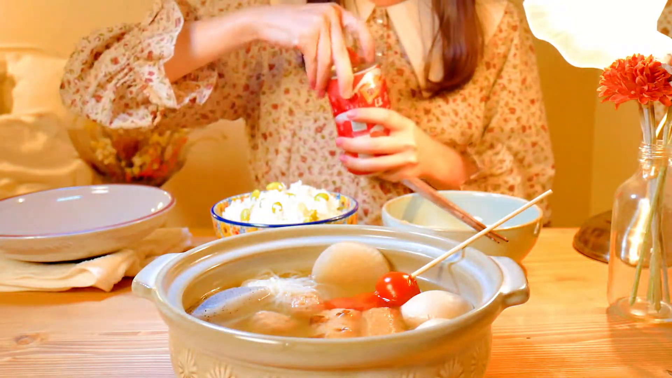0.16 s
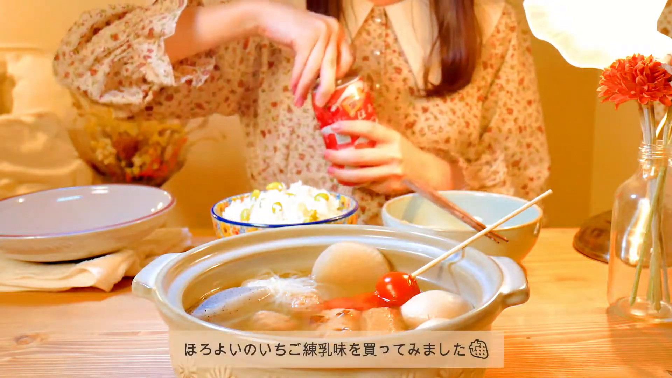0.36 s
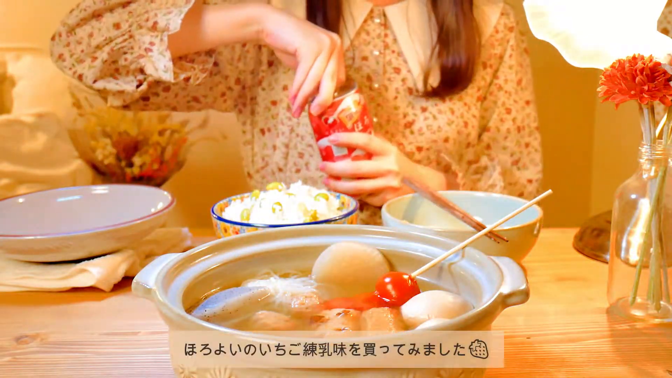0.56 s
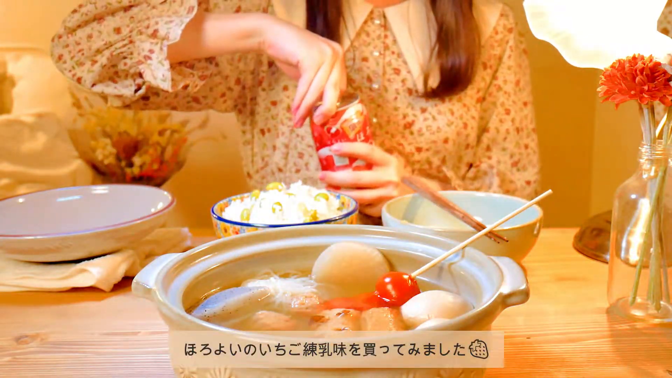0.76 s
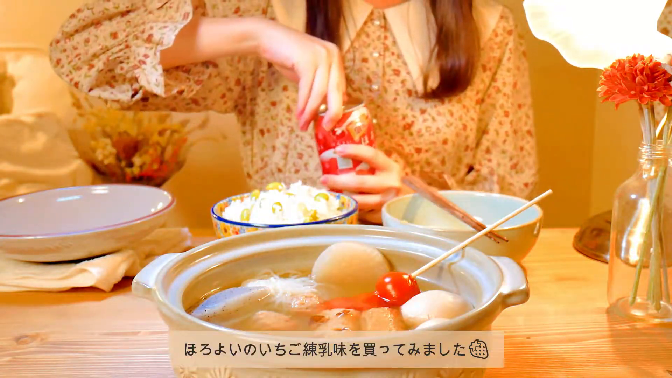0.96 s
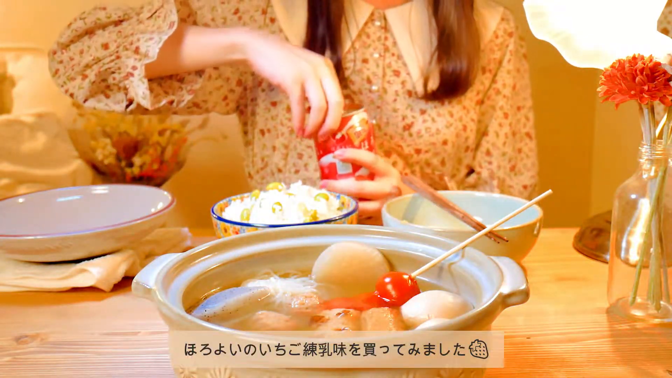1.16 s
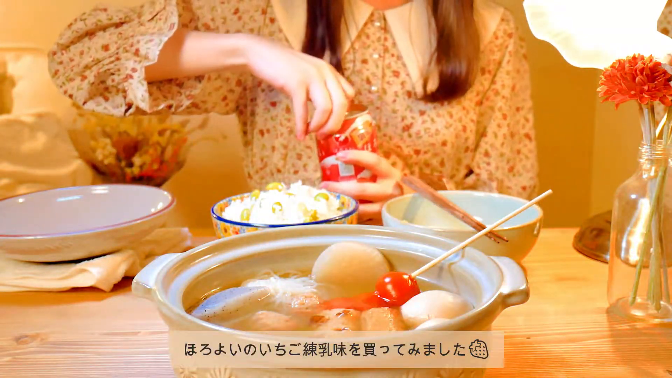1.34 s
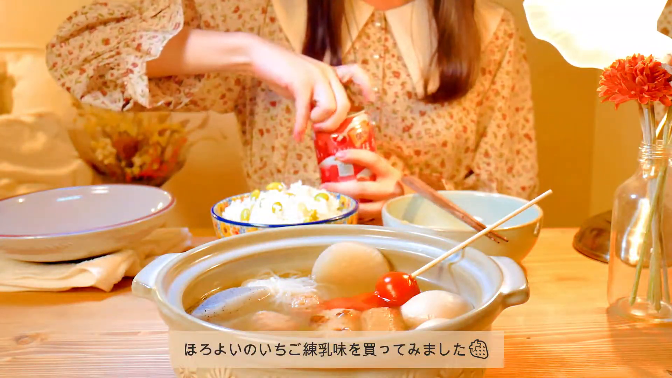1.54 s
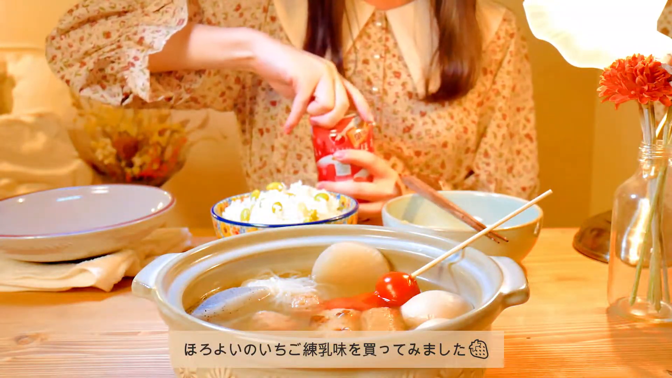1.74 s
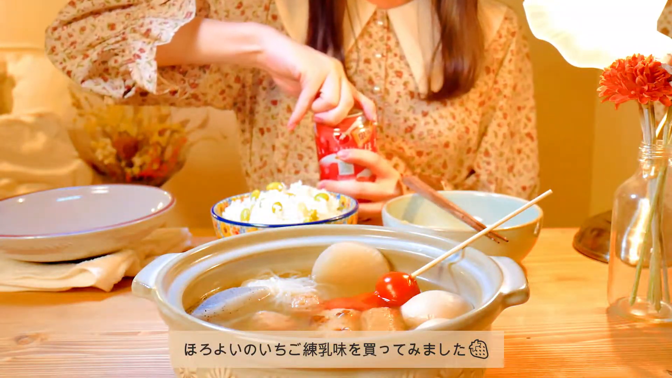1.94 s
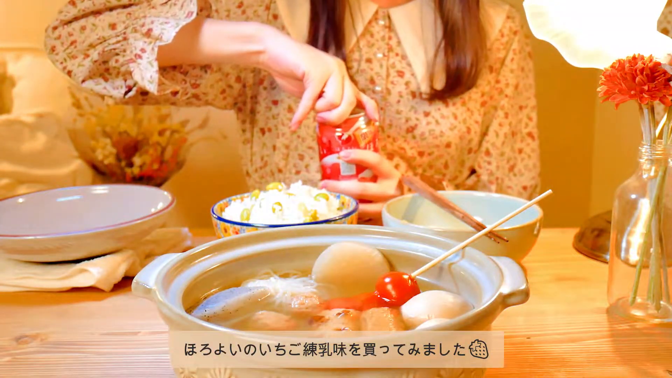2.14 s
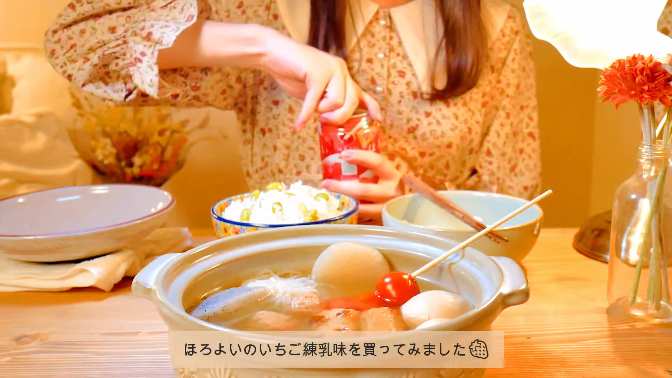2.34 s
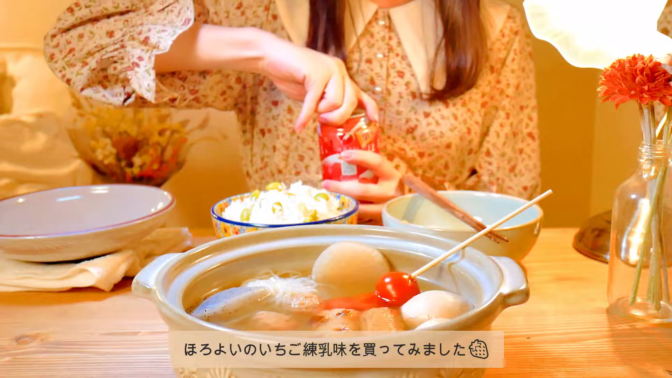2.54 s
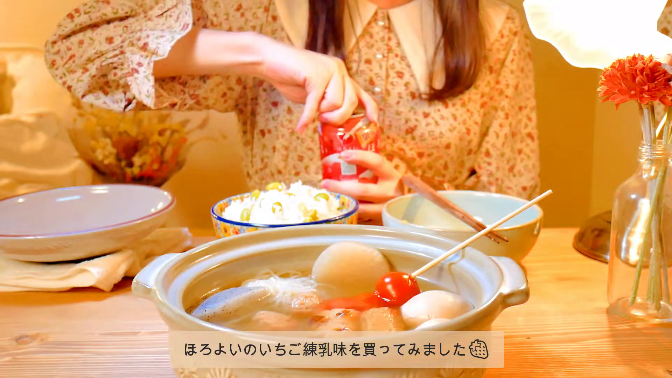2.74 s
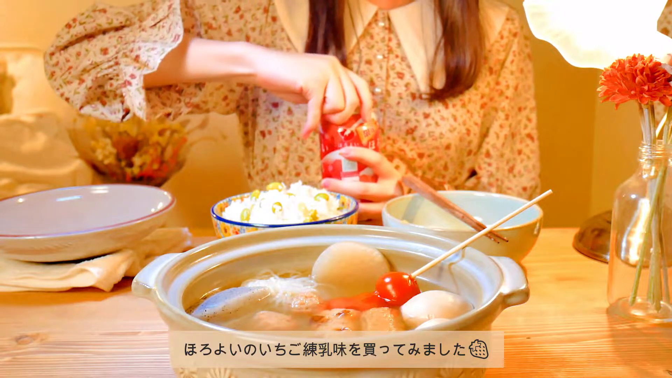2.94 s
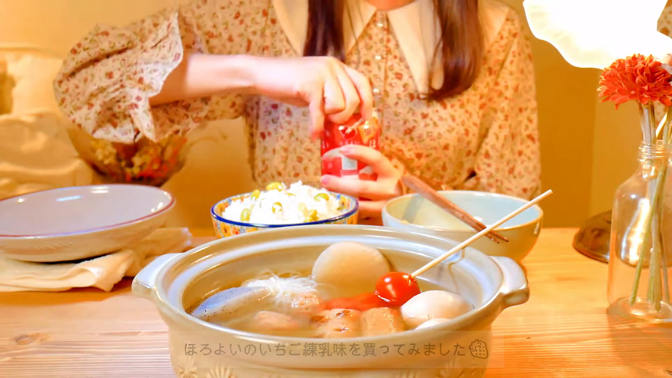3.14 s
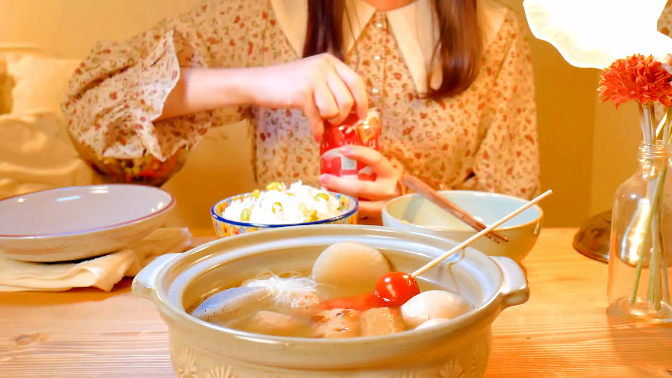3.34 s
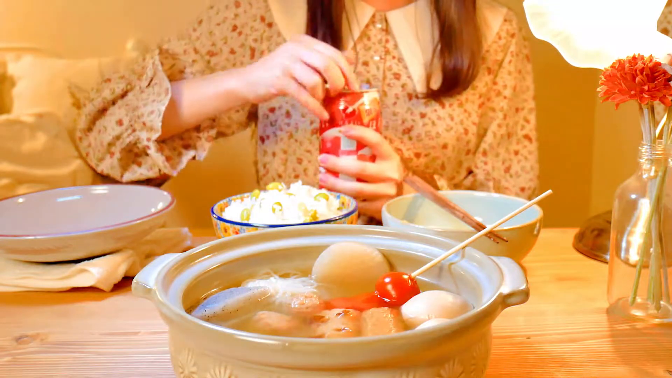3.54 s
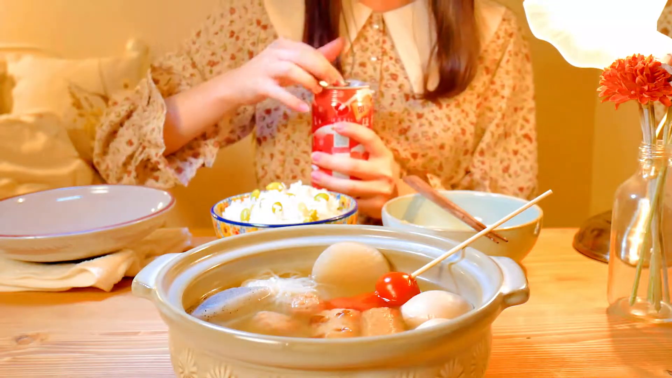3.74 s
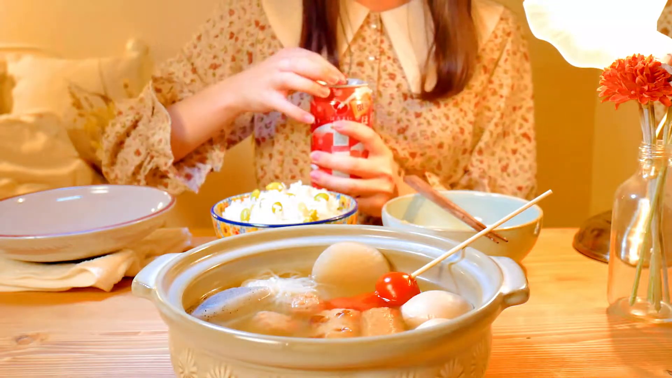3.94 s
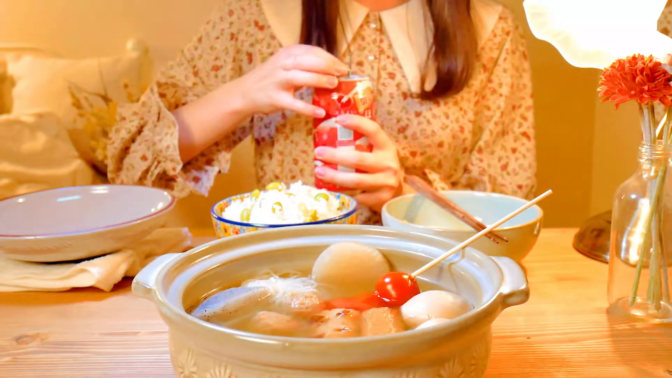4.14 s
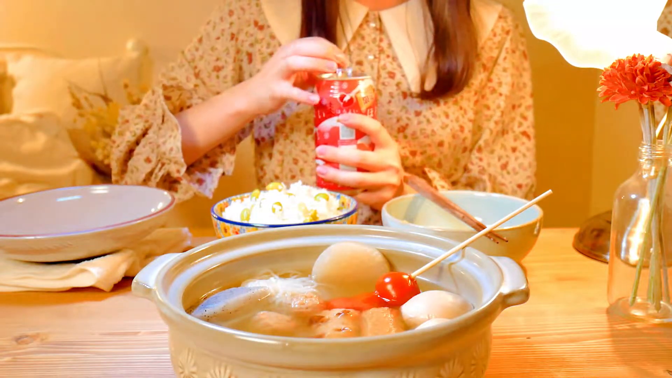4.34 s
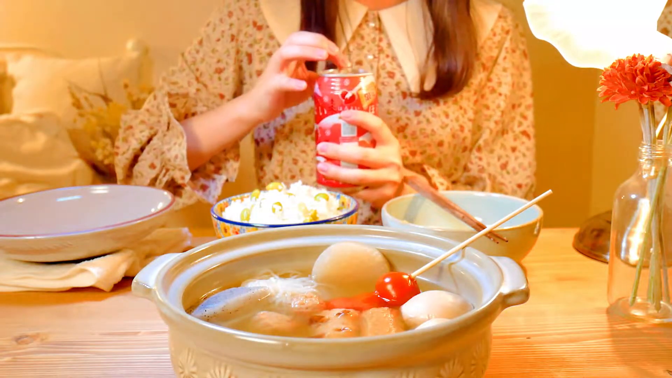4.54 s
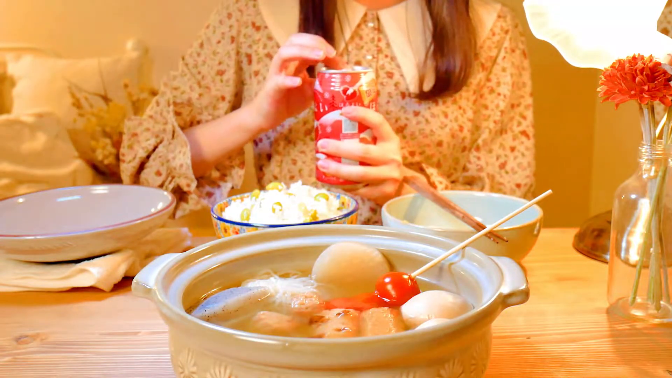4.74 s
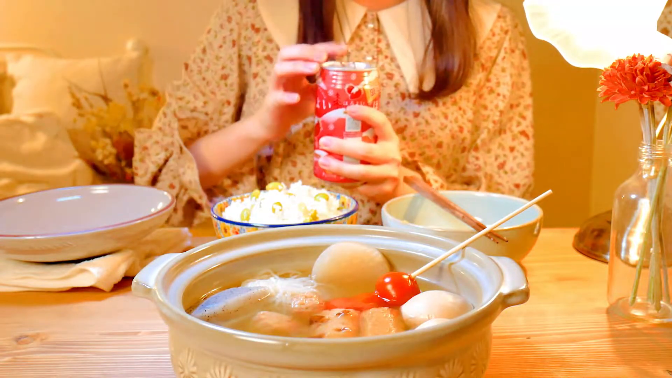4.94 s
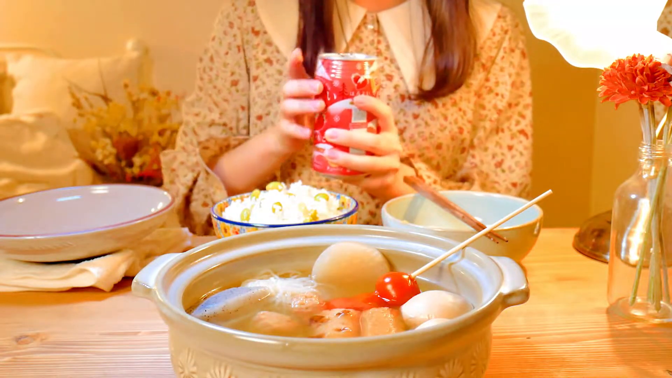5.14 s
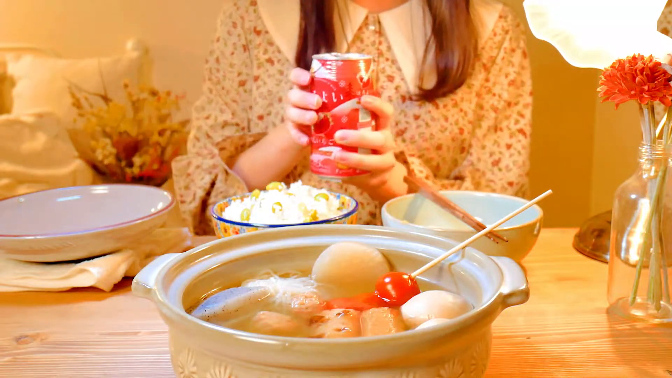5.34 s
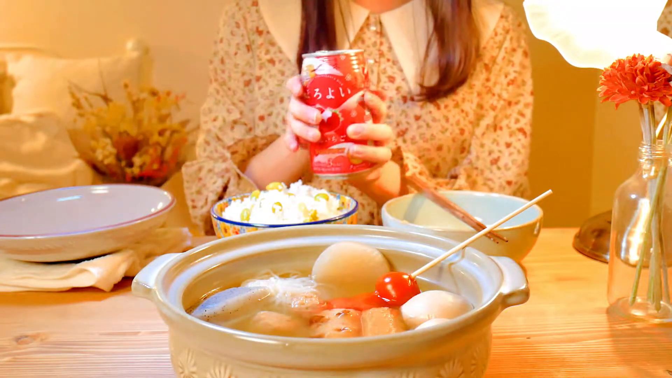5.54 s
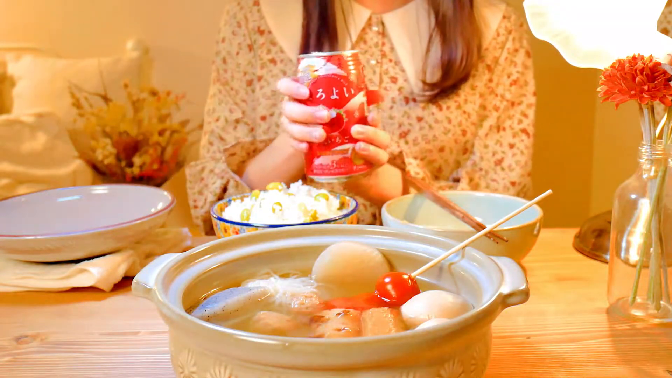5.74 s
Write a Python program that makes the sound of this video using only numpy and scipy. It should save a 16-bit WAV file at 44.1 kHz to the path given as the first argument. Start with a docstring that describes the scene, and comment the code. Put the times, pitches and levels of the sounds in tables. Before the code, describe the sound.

Close stereo pickup in a small quiet room with a faint low hum. Light nail ticks and skin rubs on a can lid, then a sharp pop with a brief thin hiss. Half a second later the lid tears in crackles and snaps loudly open with a short dull gas puff and tiny glugs. Later the tab clicks back, a nail scrapes, and faint fizz remains.

```python
"""A small quiet room: fingers lift the pull tab of a full aluminium drink can on a table.
Nail ticks, the seal pops, gas hisses out, the lid tears along its score in crackles and snaps open, the tab folds back.
Clicks are struck damped modes with dense crackle, answered by the table and the walls; gas, tearing metal, broad tails
after clicks, skin and nail are shaped noise with an uneven level. Bubbles are short rising sines. The opened drink
fizzes faintly over a low hum, both made of noise."""
import sys
import numpy as np
from scipy import signal
from scipy.fft import rfft, irfft, next_fast_len
from scipy.io import wavfile
from scipy.ndimage import map_coordinates

SR = 44100
rng = np.random.default_rng(int(sys.argv[2]) if len(sys.argv) > 2 else 0)


def dump_mix(stems):
    """Bounce the given channels to the path in sys.argv[1] as a 16-bit WAV at rate SR."""
    frames = np.atleast_2d(stems).T  # one column per channel
    limited = np.clip(frames, -1, 1)  # hard clip at full scale
    pcm = np.round(limited * 32767).astype(np.int16)
    wavfile.write(sys.argv[1], SR, pcm)


N = 255339

# clicks of tab and lid: t/s, level/dB, lid pitch f/Hz, overtone level/dB and tab level/dB relative to the lid
CLICK_EVENTS = [(0.1463, -31.5, 2390, 2, -4.5), (0.1518, -35, 2300, -3, -13), (0.3732, -47, 2490, -14, -29),
                (1.0433, -50, 2450, -3, -34), (1.0998, -29.5, 2350, -7.5, -18),
                (1.1077, -40, 2280, -3, -21), (1.292, -43.5, 2480, 0, -5.5), (1.2987, -47, 2720, -8, -14),
                (1.522, -42, 2260, -28, -38), (2.1762, -6.5, 2420, -10, -21.5),
                (2.5399, -15, 2284, -11.5, -14.5), (2.6164, -37, 2230, -18, -25),
                (2.627, -33, 2250, -25, -22), (2.6414, -21, 2478, -16, -30),
                (2.7146, -25, 2120, -27, -26.5), (2.7165, -28, 2124, -26, -28),
                (2.719, -18.5, 2263, -14, -13.5), (2.7228, -23.5, 2172, -6, -21),
                (2.726, -25, 2136, -8.5, -15), (2.758, -32, 2190, -19, -22),
                (2.8186, -38.5, 2280, -25.5, -29.5), (2.8238, -33.5, 2245, -23, -25.5),
                (2.8266, -25, 2348, -21.5, -25.5), (2.8406, -31, 2570, -21, -27.5),
                (2.8454, -18, 2360, -19.5, -34), (2.8543, -23, 2310, -22.5, -32),
                (2.8574, -28, 2310, -23, -31), (2.8608, -29, 2350, -20, -31), (2.865, -29, 2300, -18, -31),
                (2.8677, -26, 2300, -21.5, -23), (2.8808, -15, 2470, -26.5, -39.5),
                (2.8828, -17, 2400, -26, -38), (2.8855, -0.5, 2260, -14.5, -24),
                (2.9058, -28.5, 2326, -13.5, -18.5), (3.2153, -40, 2350, -22, -30.5),
                (3.2247, -37, 2264, -22, -20), (4.3656, -16, 2465, -7, -24),
                (4.3716, -22.5, 2570, -11, -12), (4.3742, -16, 2260, -2.5, -18.5),
                (4.38, -18.5, 2800, -16, -27), (4.3954, -28.5, 2760, -4, -11),
                (4.6963, -38.5, 2284, -11.5, -33), (5.7195, -48, 2336, -17, -11.5)]
# jolts of the lid against the can body: t/s, peak level/dB
BODY_KNOCKS = [(2.8802, -42.5), (2.8846, -16), (2.906, -52), (4.3943, -42)]
# ringing modes of the can body, the lid overtones and the tab: f/Hz, level/dB, t60/s
BODY_MODES = [(513, -14, 0.019), (906, -1.5, .018), (1270, 1.5, 0.0077), (1800, 1, 0.0097)]
LID_OVERTONES = [(2800, -3, .005), (3150, 0, .006), (3600, 0, .007), (4000, -2, .006), (4350, 0, .007),
                 (4800, -3, .006), (5250, -3, .006)]
TAB_MODES = [(7390, 1.5, 0.0057), (8620, -1, 0.0065), (9540, 3, 0.0044), (10700, -2.5, .004),
             (13100, -5, .004)]
LID_T60_S, BODY_DB = 0.0065, -36  # ring of the lid's main mode; the can body under every click
# overtone favoured by a click at 0 dB of overtones: sharper clicks strike higher ones
FAVOURED_HZ, FAVOURED_HZ_PER_DB = 3910, 60
OPEN_S = 2.9  # the can counts as open from here
OPEN_FAVOURED_HZ = 3150  # the torn lid is slacker: its overtones sit lower
SEALED_HZ, SLACK_HZ = 1750, 1200  # the lid radiates little below this, sealed and torn

# puffs of gas: t/s, hold/s, hiss level/dB, lid band level/dB, can cavity level/dB, hiss fall/(dB per s)
GAS_PUFFS = [(2.177, .11, -46.5, -49, -73, 316), (2.886, .02, -42, -40, -40.5, 259.5)]
PUFF_ATTACK_S, SWELL_DB_PER_S = 0.0099, 29  # the flow swells while it holds
LINGER = 0.68  # lid band and cavity die at this share of the hiss's speed
# noise swells in the lid band, tearing metal and broad room tails after clicks:
# peak t/s, lid band level/dB, rise/s, fall/s
LID_BAND_SWELLS = [(2.283, -36.5, 0.049, 0.059), (2.546, -45, .006, .14), (2.645, -50.5, 0.029, 0.095),
                   (2.725, -48, .012, .15), (2.855, -34.5, 0.043, 0.055)]
SWELL_HISS_DB, SWELL_CAN_DB = -16, -26.5  # relative to the lid band
# relative spectra of lid band, thin hiss, and the duller hiss of a wide opening: f/Hz, level/dB
LID_BAND_SPECTRUM = [(180, -50.5), (300, -20.5), (356, -33), (417, -20), (454, -19), (1410, -26),
                     (2400, -0.5), (2620, -7), (5500, -23.5), (7150, -52.5), (12100, -120)]
THIN_HISS_SPECTRUM = [(2650, -29.5), (4500, -2.5), (5100, -4), (5890, -12), (7400, 1.5), (9730, -1),
                      (13300, -8.5), (14900, -17), (15500, -23.5)]
WIDE_HISS_SPECTRUM = [(2650, -29.5), (4500, -1), (5770, -12), (7470, -0.5), (13800, -40), (14400, -48),
                      (15500, -38.5)]
# resonances of the air space above the drink: f/Hz, width at half amplitude/Hz, level/dB
CAVITY_RESONANCES = [(660, 54, 0), (930, 170, 0.5), (1250, 85, -6), (1566, 280, 2.5)]

# fingertips rubbing the lid: peak t/s, level/dB, rise/s, fall/s
SKIN_RUBS = [(.058, -56, 0.03, .065), (.38, -60.5, .012, 0.14), (1.103, -53, 0.0075, 0.088),
             (3.226, -50, 0.029, 0.1), (4.699, -55.5, .05, 0.037), (5.72, -60.5, .13, .07)]
# short dry scrapes of a nail on the rim: peak t/s, level/dB, rise/s, fall/s
NAIL_SCRAPES = [(4.7305, -60, .002, .005), (4.744, -46.5, .003, 0.012)]
# relative spectra of skin and nail on metal: f/Hz, level/dB
SKIN_SPECTRUM = [(710, -38), (1200, -11.5), (2860, -1.5), (3460, -5), (5240, -21), (7410, -24),
                 (12000, -35), (15600, -65), (22000, -120)]
NAIL_SPECTRUM = [(1500, -40), (2200, -1), (3200, -2), (5000, 3), (6300, -5), (8000, -5.5), (10500, -23),
                 (15500, -28)]
EDGE_DB = 25  # a swell, rub or scrape changes by this much over its rise or fall time

# low puffs and glugs: t/s, starting f/Hz, level/dB, t60/s
GLUGS = [(2.177, 255, -25, 0.011), (2.716, 503.6, -39.5, 0.074), (2.887, 224, -37, 0.015),
         (2.945, 460, -28, 0.011), (2.962, 684, -41, 0.067), (3.525, 702, -44.5, 0.035)]

# echoes of the room: f/Hz, t60/s
ROOM_DECAY = [(300, 0.089), (2000, .2), (5000, .2), (12000, 0.13)]
# left-right likeness of the echoes and of the background: f/Hz, likeness (-1 to 1)
ROOM_LIKENESS = [(500, 0.5), (2000, .9), (4000, 0.93), (9000, 0.6)]
AIR_LIKENESS = [(60, -0.13), (150, 0.39), (380, -0.13), (950, -0.49), (2380, 0.96), (5980, 0.34),
                (15000, 0.57)]
TABLE_S, TABLE_DB = .0063, -14  # the strong first echo
ROOM_DB, ROOM_PER_DB = -0.5, 0.37  # sharper clicks send more to the walls

# slow course of the hum: t/s, level/dB
HUM_LEVEL = [(0, -58), (.35, -56.5), (.87, -57.5), (1.32, -55.5), (2.6, -56), (3.59, -54), (4.21, -55),
             (5.79, -52)]
# relative spectra of hum, middle hiss and high hiss: f/Hz, level/dB
HUM_SPECTRUM = [(12, -60), (20, -28), (107, -21.5), (138, -7), (163, -1), (206, -6.5), (242, -1),
                (265, -11.5), (335, -6), (576, -12.5), (677, -18.5), (888, -15), (1030, -24.5),
                (1100, -24.5), (1500, -28.5), (1950, -58), (3300, -120)]
MID_SPECTRUM = [(710, -38.5), (1200, -11.5), (1350, -2.5), (1500, -6), (2000, -1), (2570, -5), (3160, -5),
                (6000, -22.5), (7800, -51.5), (13200, -120)]
HIGH_SPECTRUM = [(2940, -34.5), (5000, -9.5), (6160, -5.5), (7590, 2), (8630, -3), (10100, -4),
                 (14600, -14), (15500, -21.5)]
# unsteady motor tones: f/Hz, width/Hz, level/dB before the swing
MOTOR_DRONES = [(154.9, 15, -66), (238, 8.6, -65.5), (1109, 130, -69.5)]
MID_DB, HIGH_DB = -67, -82  # hiss levels before swing and flicker
HIGH_GROWS = 1.3  # the high hiss swings wider than the hum
FIZZ_DB, FIZZ_RISE_S = 2, .6  # lift of the high hiss by the open drink

TOP_HZ = 15600  # upper band limit


def amp(db):
    """Gain of a level in dB."""
    return 10 ** (np.asarray(db) / 20)


def unit(x):
    """Scaled to rms 1."""
    return x / np.sqrt(np.mean(x ** 2) + 1e-20)


def along(points, hz):
    """Values between (Hz, value) points on a log frequency axis."""
    f, v = np.transpose(points)
    return np.interp(np.log(hz + 1), np.log(f + 1), v)


def curves(rows):
    """One value per sample for each column after the time; -150 outside the rows."""
    s, *columns = np.transpose(rows)
    t = np.arange(N) / SR
    return [np.interp(t, s, column, left=-150, right=-150) for column in columns]


def wobble(rate):
    """A smooth random curve through rate knots a second."""
    knots = rng.standard_normal(int(N * rate / SR) + 4)
    return map_coordinates(knots, [np.arange(N) * rate / SR])


def filtered(x, response):
    """x shaped by a response over frequency."""
    size = next_fast_len(x.shape[-1] + 2048)
    spectrum = rfft(x, size) * response(np.fft.rfftfreq(size, 1 / SR))
    return irfft(spectrum, size)[..., :x.shape[-1]]


def paired(pair, likeness):
    """Two unrelated signals blended into a left and right that are partly alike."""
    def mid_side_gains(hz):
        turn = np.arccos(np.clip(along(likeness, hz), -1, 1)) / 2
        return np.array([np.cos(turn), np.sin(turn)])

    mid, side = filtered(pair, mid_side_gains)
    return np.array([mid + side, mid - side])


def rush(gain, likeness):
    """Stereo noise of rms 1 with the given gain over frequency."""
    noise = filtered(rng.standard_normal((2, N)), gain)
    return unit(paired(noise, likeness))


def shape(spectrum):
    """Gain over frequency from (Hz, dB) points."""
    return lambda hz: amp(along(spectrum, hz))


def hump(s, db, rise_s, fall_s):
    """Gain of a sound whose dB level climbs straight to a peak and falls straight."""
    t = np.arange(N) / SR - s
    return amp(db - EDGE_DB * np.maximum(-t / rise_s, t / fall_s))


def ring(modes, t, scatter_db):
    """Damped modes, struck at new strengths and slightly new pitches each time."""
    hz, db, t60 = np.transpose(modes)[..., None]
    strength, detune = rng.standard_normal((2, len(modes), 1))
    decay = amp(db + scatter_db * strength - 60 * t / t60)
    return np.sum(decay * np.sin(2 * np.pi * hz * (1 + .012 * detune) * t), axis=0)


def struck_peak(x, t):
    """A ring scaled to peak 1 after the metal takes a cycle or two to swing up."""
    swung = (1 - np.exp(-t / .00035)) ** 2 * x
    return swung / np.abs(swung).max()


def echoes(x, size):
    """x through a fresh noise tail of energy 1 in which each frequency dies at its own speed."""
    hz, t, z = signal.stft(rng.standard_normal((2, size)), SR, nperseg=128)
    decay = amp(-60 * t / along(ROOM_DECAY, hz)[:, None])
    tail = signal.istft(z * decay, SR, nperseg=128)[1][:, :size]
    fade_in = np.clip((np.arange(size) / SR - .0025) / 0.002, 0, 1)  # the walls answer a little late
    tail = paired(tail, ROOM_LIKENESS) * fade_in
    return signal.fftconvolve(x[None], tail / np.sqrt(np.sum(tail ** 2) / 2), axes=1)


def clicks():
    """Each click rings the lid's main mode, its overtones, the tab and the can body; table and room answer."""
    out, t = np.zeros((2, N + SR)), np.arange(SR // 20) / SR
    lid_crack_band = signal.butter(4, [1900, 4800], "bandpass", fs=SR, output="sos")
    tab_crack_band = signal.butter(4, [6600, 12500], "bandpass", fs=SR, output="sos")
    for s, db, hz, upper_db, bright_db in CLICK_EVENTS:
        if s < OPEN_S:
            favoured_hz = FAVOURED_HZ + FAVOURED_HZ_PER_DB * upper_db
            favoured_hz = np.clip(favoured_hz, LID_OVERTONES[0][0], LID_OVERTONES[-1][0])
            low_hz = SEALED_HZ
        else:
            favoured_hz, low_hz = OPEN_FAVOURED_HZ, SLACK_HZ
        lid = struck_peak(ring([(hz, 0, LID_T60_S)], t, scatter_db=1), t)
        lid = signal.sosfilt(signal.butter(3, low_hz, "highpass", fs=SR, output="sos"), lid)

        # overtones near the favoured pitch are struck hardest
        struck = [(f, level - 14 * abs(np.log(f / favoured_hz)), t60) for f, level, t60 in LID_OVERTONES]
        # decaying noise stands for the many dense small modes
        crack = amp(-60 * t / .006) * rng.standard_normal((4, len(t)))
        upper = ring(struck, t, scatter_db=5) + amp(3) * signal.sosfilt(lid_crack_band, crack[0])
        upper = amp(upper_db) * struck_peak(upper, t)
        bright = ring(TAB_MODES, t, scatter_db=3.5) + signal.sosfilt(tab_crack_band, crack[1])
        bright = amp(bright_db) * struck_peak(bright, t)
        body = amp(BODY_DB) * struck_peak(ring(BODY_MODES, t, scatter_db=5.0), t)
        rest = upper + bright + body

        # the short waves radiate unevenly and reach left and right unalike
        side = amp(upper_db - 11) * struck_peak(signal.sosfilt(lid_crack_band, crack[2]), t)
        side += amp(bright_db - 5.0) * struck_peak(signal.sosfilt(tab_crack_band, crack[3]), t)
        direct = amp(db) * (lid + rest)
        at = round(s * SR)
        out[:, at:at + len(t)] += direct * amp([[-.25], [.25]]) + amp(db) * np.outer([1, -1], side)
        out[:, at + round(TABLE_S * SR):][:, :len(t)] += amp(TABLE_DB) * direct

        # the main mode beams forward, less to the walls
        room_db = ROOM_DB + ROOM_PER_DB * upper_db
        wet = amp(db + room_db) * echoes(amp(-11) * lid + rest, size=SR // 4)
        out[:, at:at + wet.shape[1]] += wet
    return out[:, :N]


def knocks():
    """The can body rings low and short when the lid jolts it; the room answers."""
    out, t = np.zeros((2, N + SR)), np.arange(SR // 20) / SR
    for s, db in BODY_KNOCKS:
        body = amp(db) * struck_peak(ring(BODY_MODES, t, scatter_db=3.5), t)
        sound = amp(-10.0) * echoes(body, size=SR // 4)
        sound[:, :len(t)] += body
        out[:, round(s * SR):][:, :sound.shape[1]] += sound
    return out[:, :N]


def puff(s, hold_s, db, fall_db):
    """Gain of a gas puff: quick attack, swelling hold, steady fall in dB per second."""
    t = np.arange(N) / SR - s
    swell_db = SWELL_DB_PER_S * np.clip(t, 0, hold_s)
    drop_db = fall_db * np.clip(t - hold_s, 0, None)
    return np.clip(t / PUFF_ATTACK_S, 0, 1) * amp(db + swell_db - drop_db)


def cavity_gain(f):
    """Resonant peaks of the air space above the drink."""
    return sum(amp(db) / (1 + ((f - hz) / width_hz * 2) ** 2) for hz, width_hz, db in CAVITY_RESONANCES)


def gas_and_swells():
    """Sputtering noise in the lid band, hiss and can cavity: gas puffs, tearing metal and broad tails after clicks."""
    lid_band = unit(rush(shape(LID_BAND_SPECTRUM), ROOM_LIKENESS) * amp(3 * wobble(250)))
    hollow = rush(cavity_gain, ROOM_LIKENESS)
    thin_hiss = unit(rush(shape(THIN_HISS_SPECTRUM), ROOM_LIKENESS) * amp(1.4 * wobble(200)))
    wide_hiss = unit(rush(shape(WIDE_HISS_SPECTRUM), ROOM_LIKENESS) * amp(1.4 * wobble(200)))

    swell_mix = lid_band + amp(SWELL_HISS_DB) * wide_hiss + amp(SWELL_CAN_DB) * hollow
    out = sum(hump(*row) for row in LID_BAND_SWELLS) * swell_mix
    # the first puff has the thin hiss, the second the duller one
    for row, hiss in zip(GAS_PUFFS, (thin_hiss, wide_hiss)):
        s, hold_s, hiss_db, lid_db, can_db, fall_db = row
        out += puff(s, hold_s, hiss_db, fall_db) * hiss
        low_mix = amp(lid_db) * lid_band + amp(can_db) * hollow
        out += puff(s, hold_s, 0, LINGER * fall_db) * low_mix
    return out


def rubs():
    """Skin slips over the metal in small uneven jerks; a nail scrapes brighter."""
    slips = unit(rush(shape(SKIN_SPECTRUM), ROOM_LIKENESS) * amp(3.0 * wobble(220)))
    nail = unit(rush(shape(NAIL_SPECTRUM), ROOM_LIKENESS) * amp(2.8 * wobble(600)))
    skin_gain = sum(hump(*row) for row in SKIN_RUBS)
    nail_gain = sum(hump(*row) for row in NAIL_SCRAPES)
    return skin_gain * slips + nail_gain * nail


def bubbles():
    """Short low puffs and glugs: damped sines with a soft start and a slightly rising pitch."""
    out, t = np.zeros(N + SR), np.arange(SR // 8) / SR
    for s, hz, db, t60 in GLUGS:
        envelope = amp(db - 60 * t / t60) * (1 - np.exp(-t / 0.00067))
        glug = envelope * np.sin(2 * np.pi * hz * t * (1 + 1.5 * t))
        out[round(s * SR):][:len(t)] += glug
    return out[:N] + amp(-4.5) * echoes(out, size=SR // 4)[:, :N]


def air():
    """Room rumble, motor drones and flickering hiss, all noise; the open drink's fizz lifts the high hiss."""
    hum_db, = curves(HUM_LEVEL)
    swing_db = hum_db - hum_db.mean()
    hum = amp(hum_db + 0.688 * wobble(5)) * rush(shape(HUM_SPECTRUM), AIR_LIKENESS)
    out = hum * amp([[.6], [-.6]])  # a little stronger on the left
    for hz, width_hz, db in MOTOR_DRONES:
        tone = rush(lambda f: 1 / (1 + ((f - hz) / width_hz * 2) ** 4), AIR_LIKENESS)
        out += amp(db + 0.57 * swing_db + 1.2 * wobble(2.3)) * tone

    flicker_db = 1.1 * wobble(12) + 1.5 * wobble(300)
    fizz_db = FIZZ_DB * np.clip((np.arange(N) / SR - OPEN_S) / FIZZ_RISE_S, 0, 1)
    mid_db = MID_DB + swing_db + flicker_db
    high_db = HIGH_DB + HIGH_GROWS * swing_db + fizz_db + flicker_db
    out += amp(mid_db) * rush(shape(MID_SPECTRUM), AIR_LIKENESS)
    return out + amp(high_db) * rush(shape(HIGH_SPECTRUM), AIR_LIKENESS)


def scene():
    """The can in front of the room's air; the small can radiates no deep bass."""
    can = clicks() + knocks() + gas_and_swells() + rubs() + bubbles()
    bass_cut = signal.butter(2, 130, "highpass", fs=SR, output="sos")
    return signal.sosfilt(bass_cut, can) + air()


def record(dry):
    """The input stage rounds off the loudest peaks and cuts above the band limit; faint converter noise is added."""
    soft = dry / (1 + np.abs(dry / .94) ** 8) ** (1 / 8)
    return filtered(soft, lambda hz: hz < TOP_HZ) + amp(-108) * rng.standard_normal(dry.shape)


dry = scene()
out = record(dry)
dump_mix(out)
```